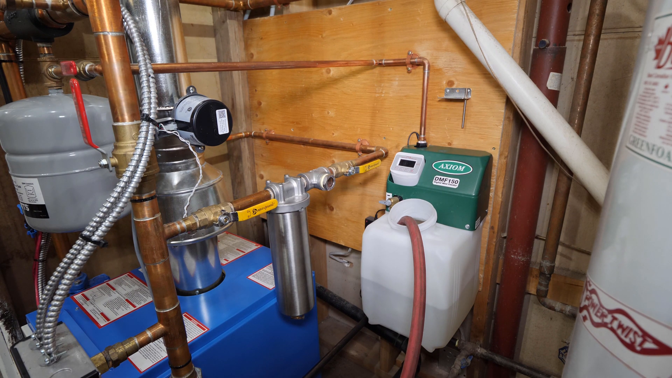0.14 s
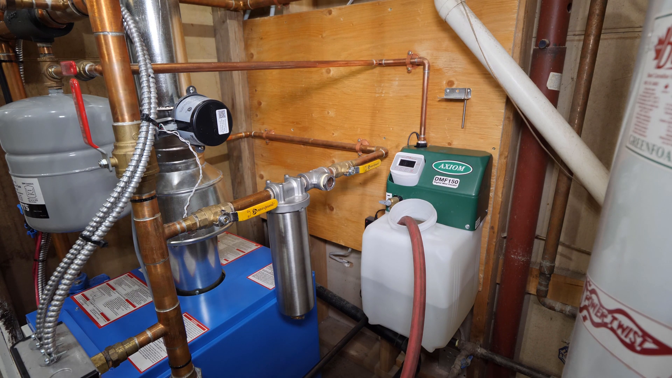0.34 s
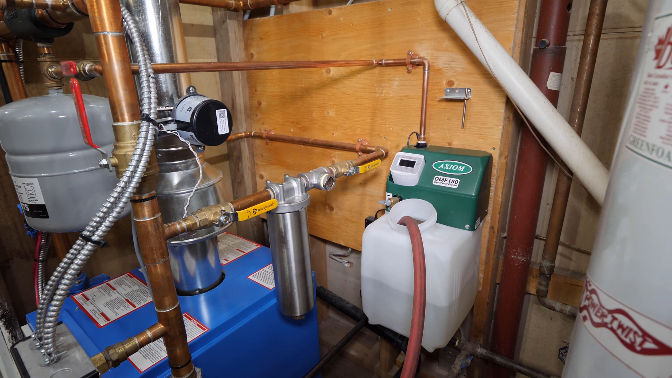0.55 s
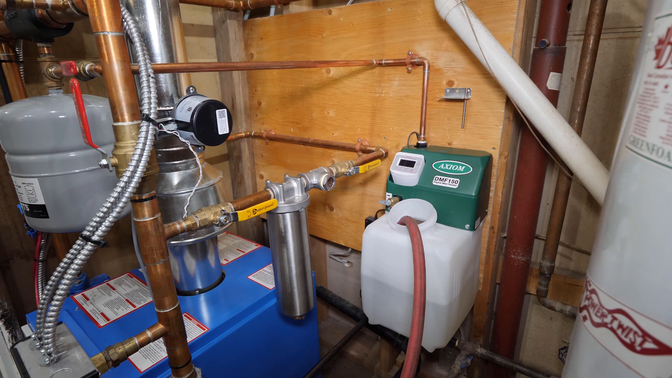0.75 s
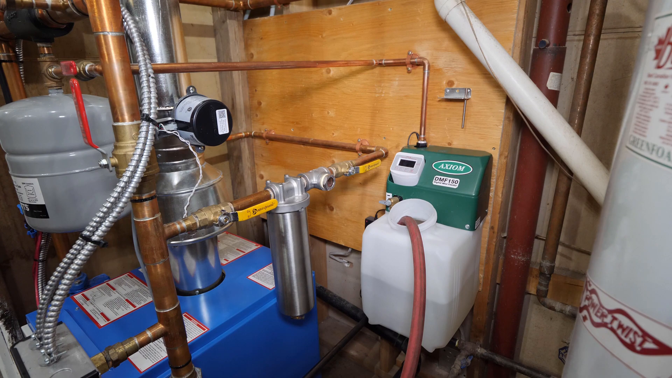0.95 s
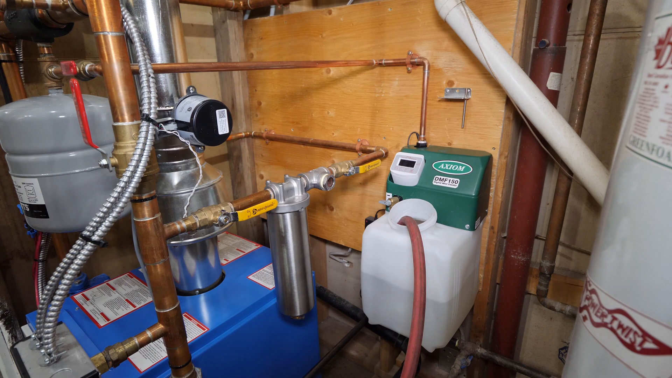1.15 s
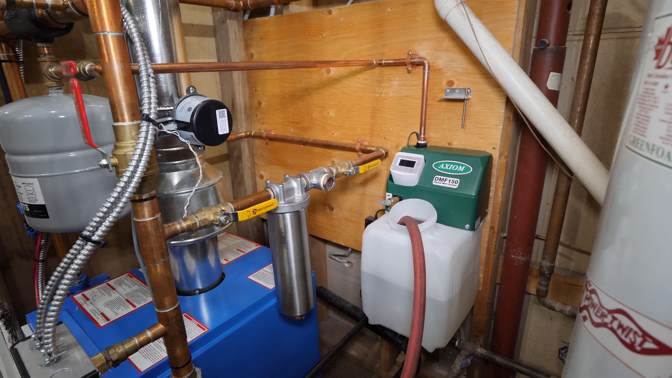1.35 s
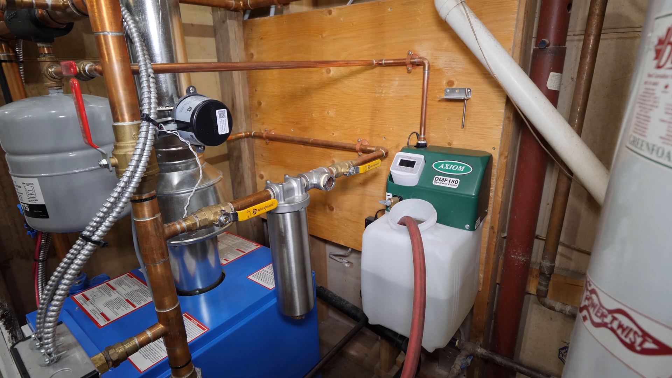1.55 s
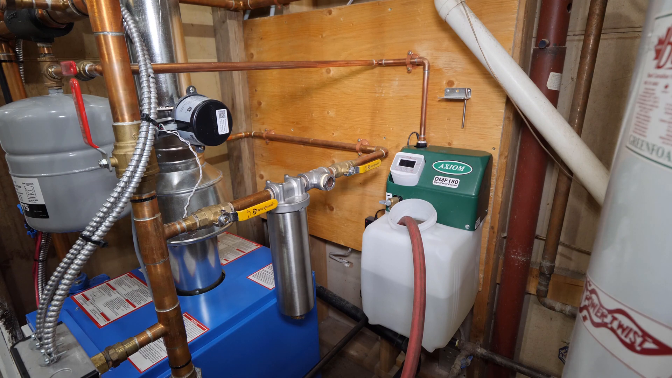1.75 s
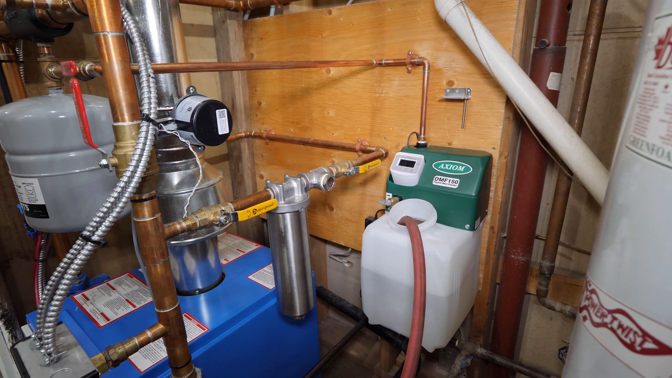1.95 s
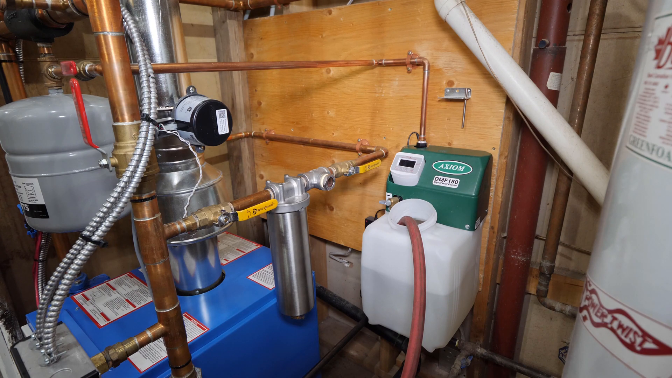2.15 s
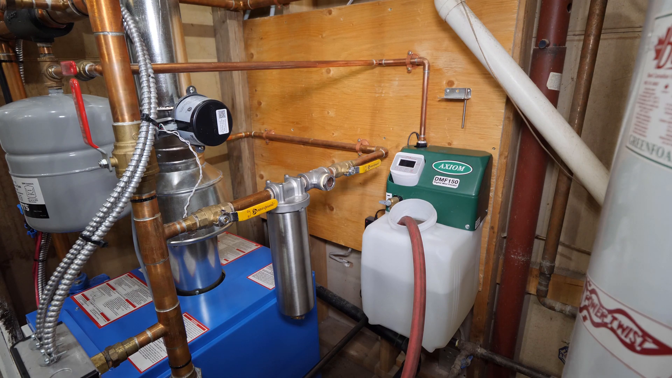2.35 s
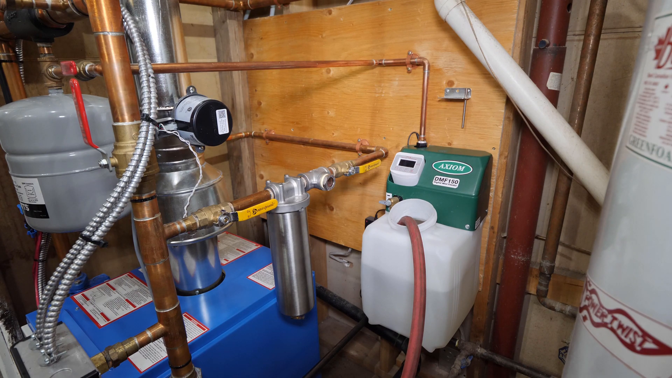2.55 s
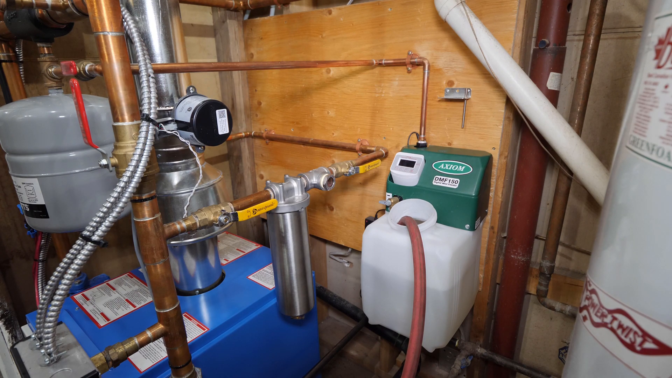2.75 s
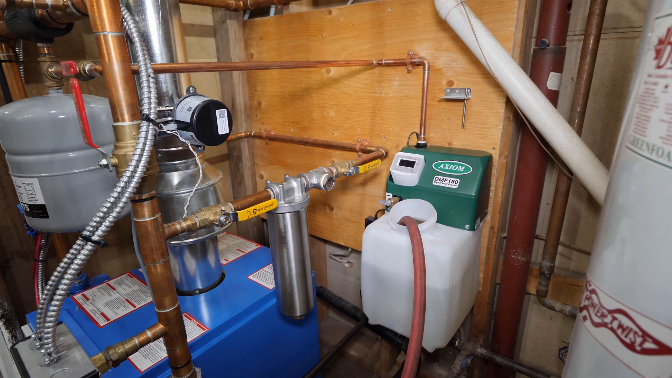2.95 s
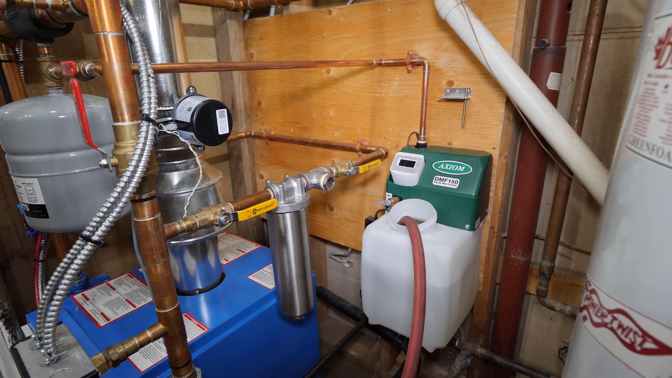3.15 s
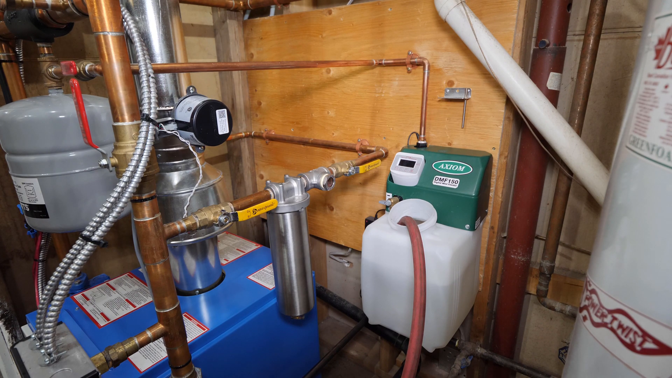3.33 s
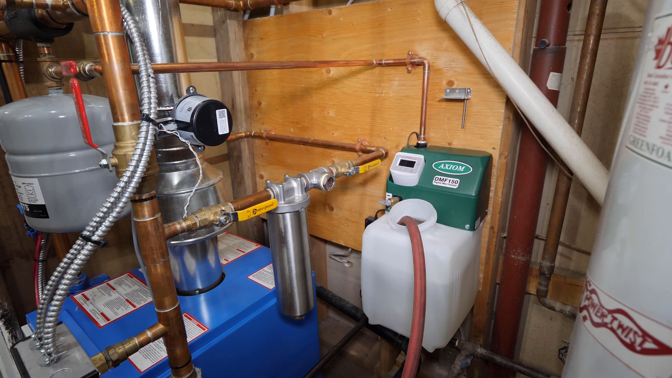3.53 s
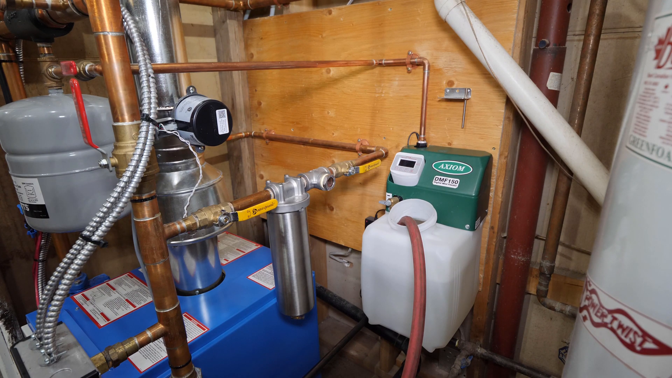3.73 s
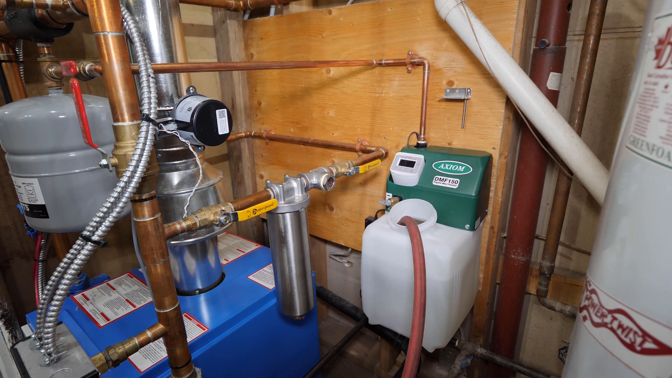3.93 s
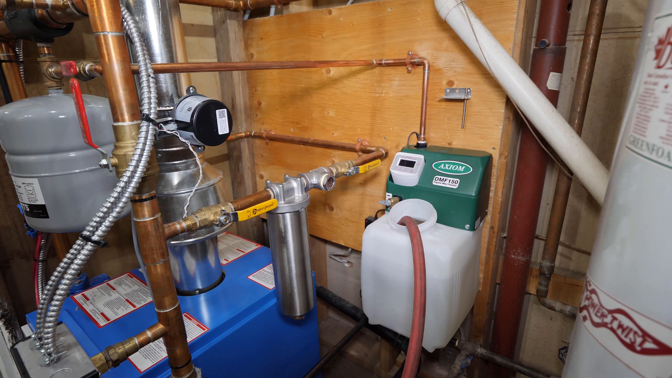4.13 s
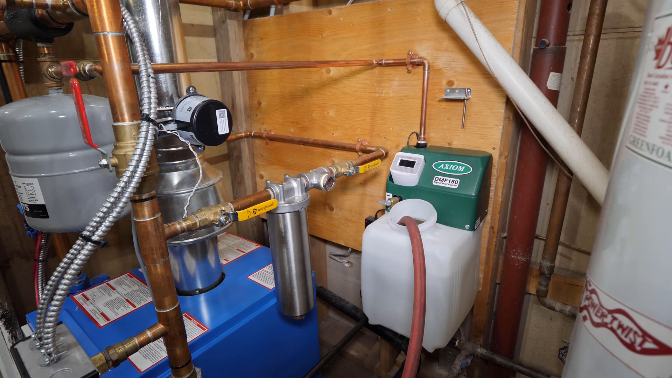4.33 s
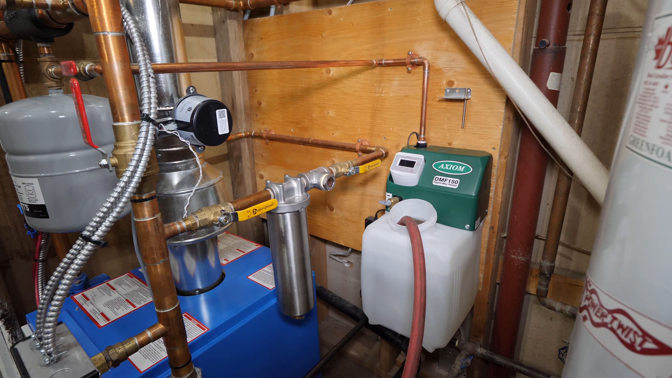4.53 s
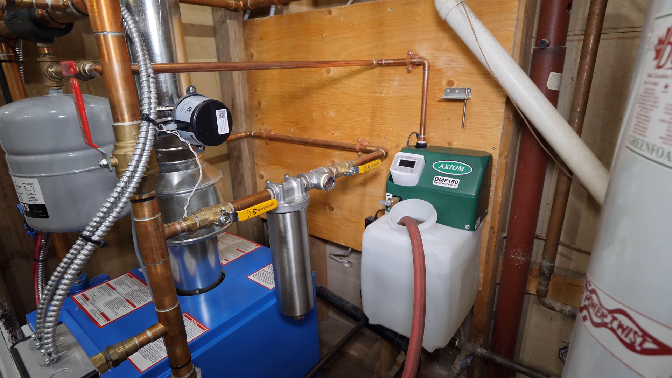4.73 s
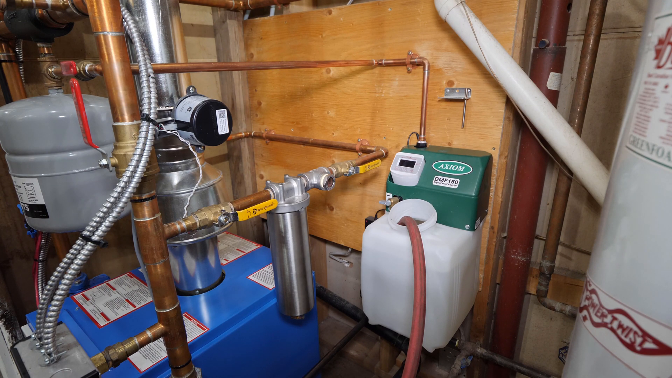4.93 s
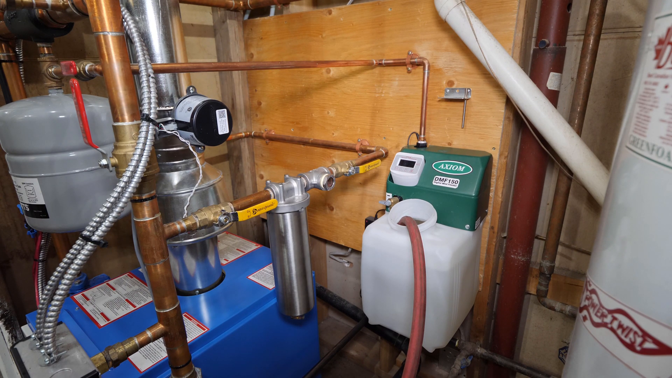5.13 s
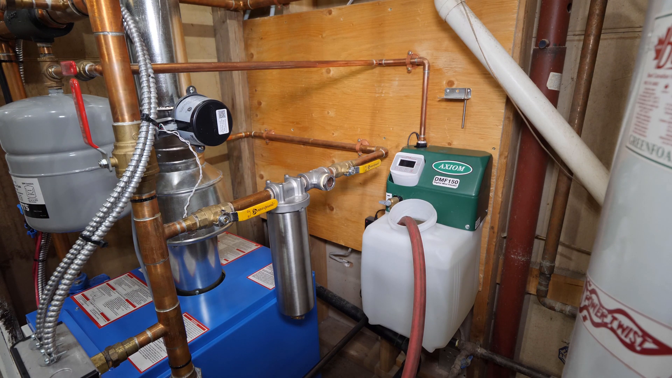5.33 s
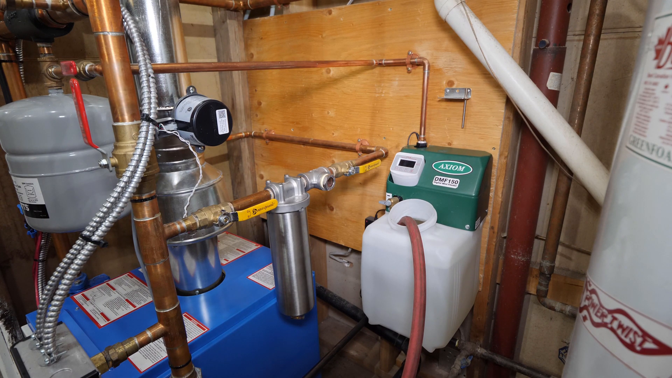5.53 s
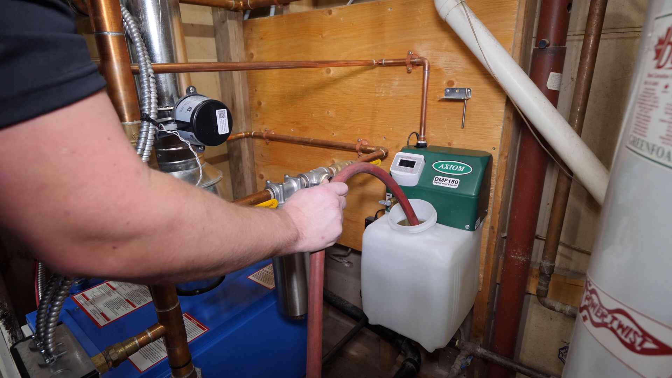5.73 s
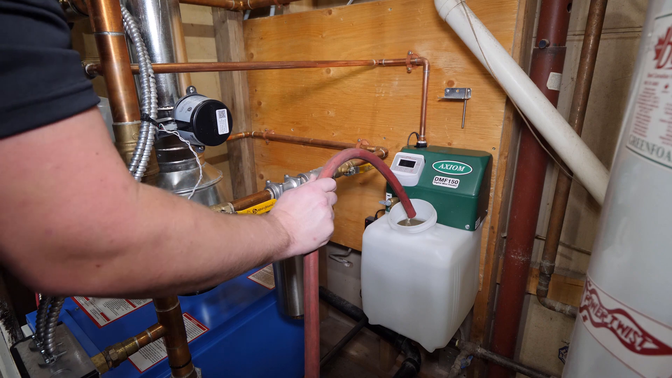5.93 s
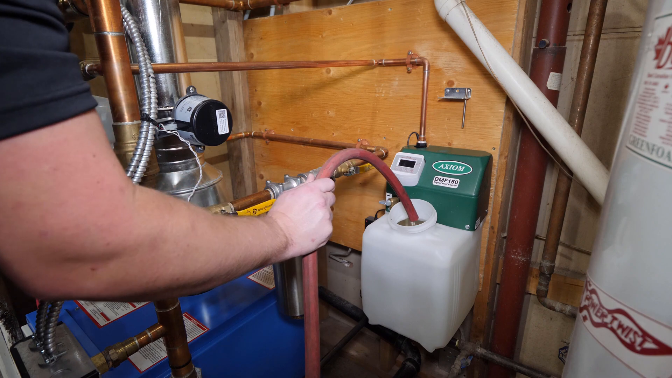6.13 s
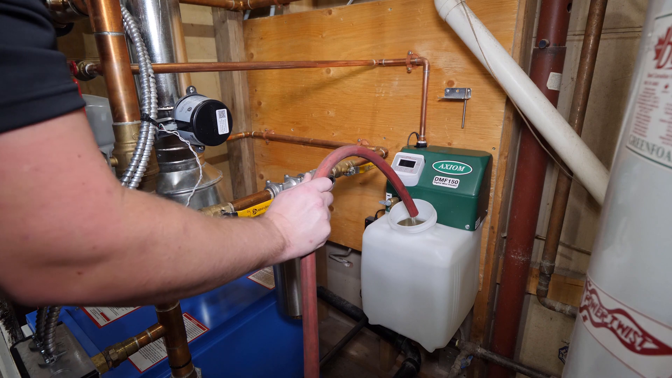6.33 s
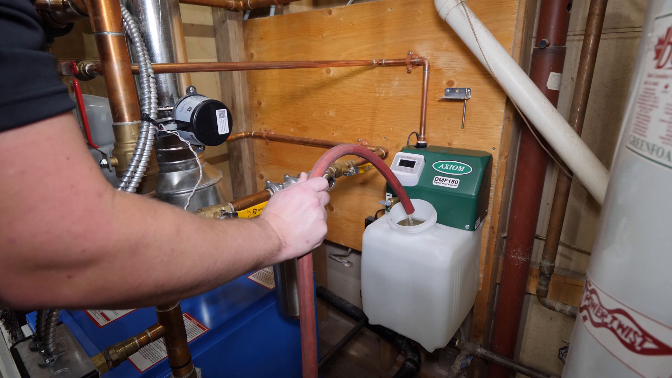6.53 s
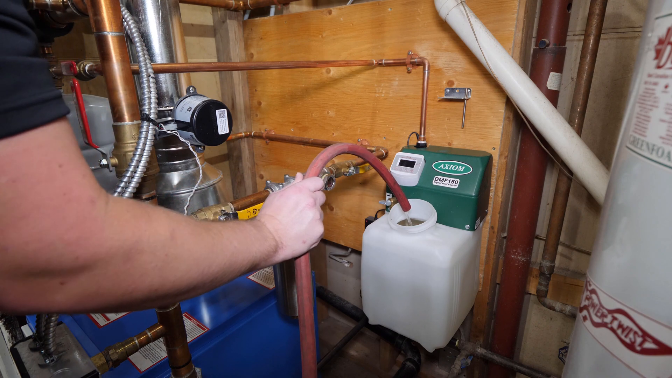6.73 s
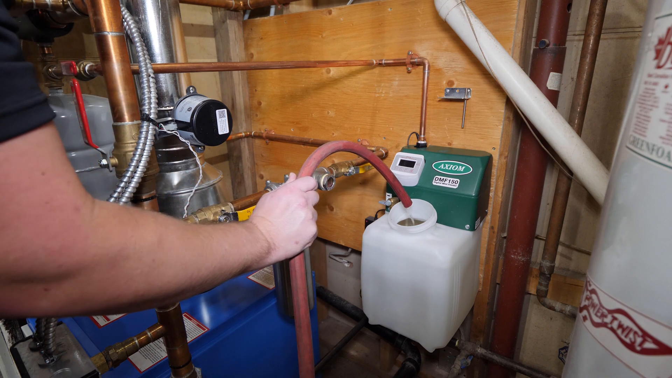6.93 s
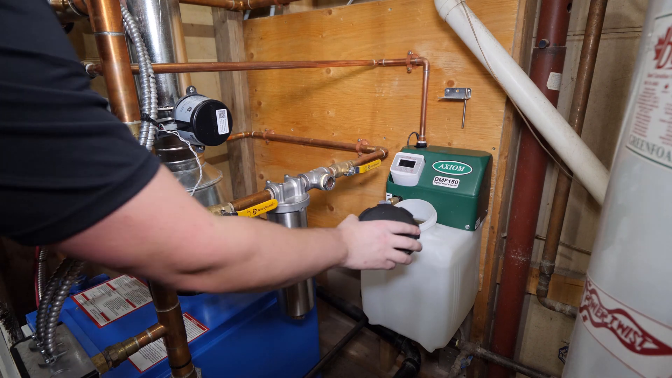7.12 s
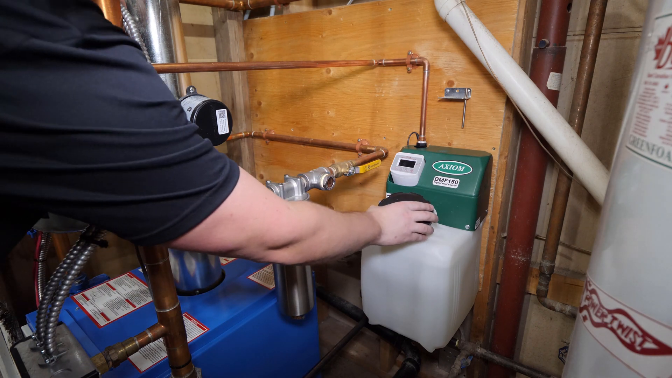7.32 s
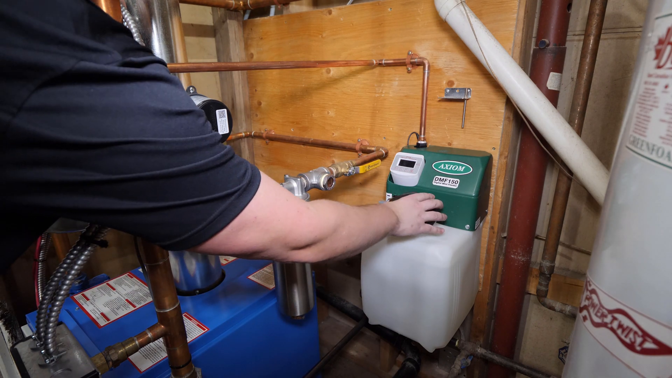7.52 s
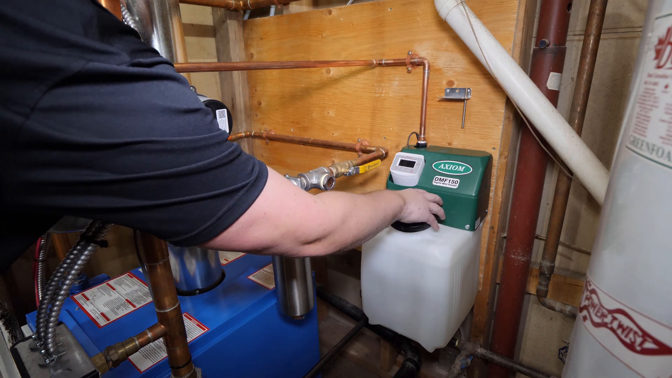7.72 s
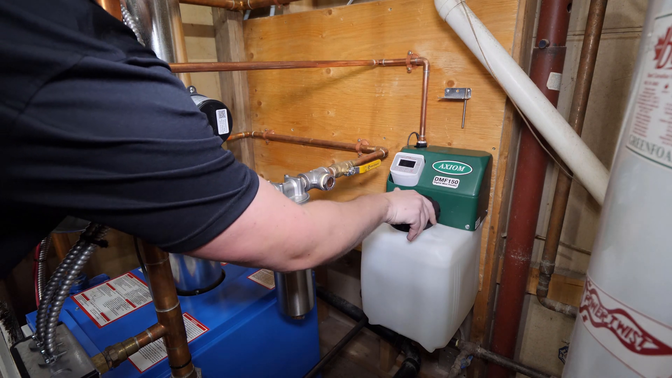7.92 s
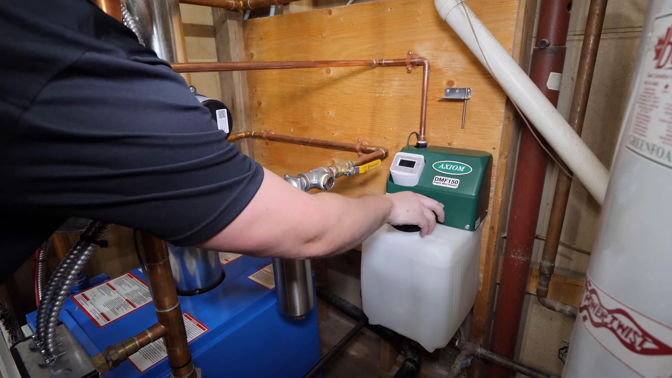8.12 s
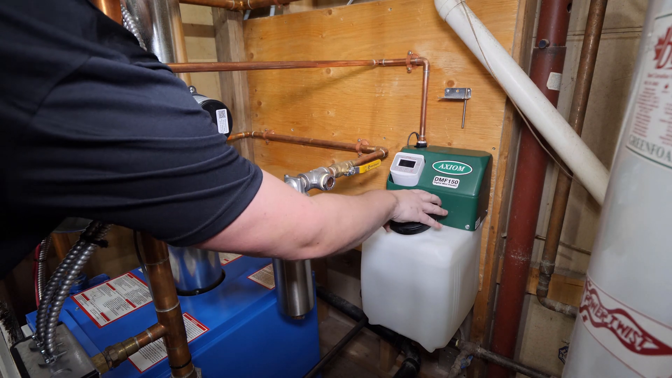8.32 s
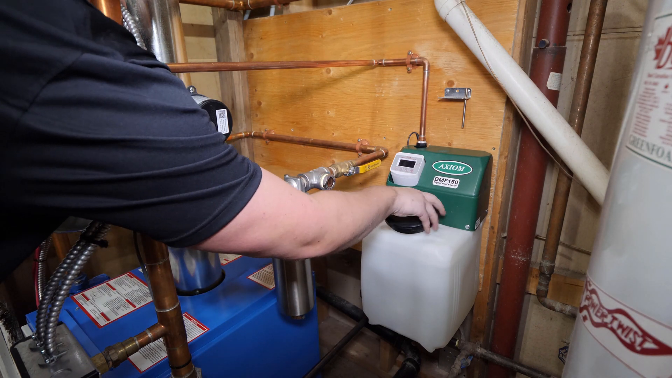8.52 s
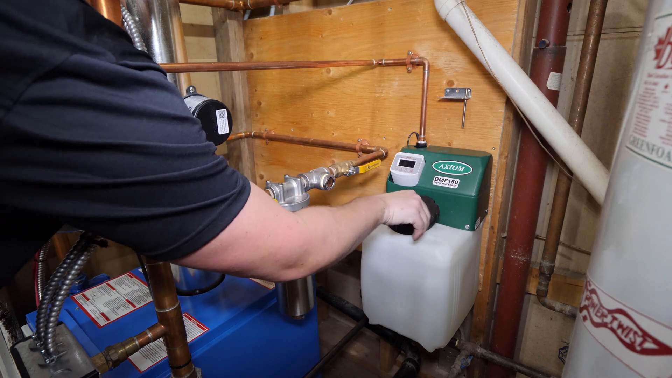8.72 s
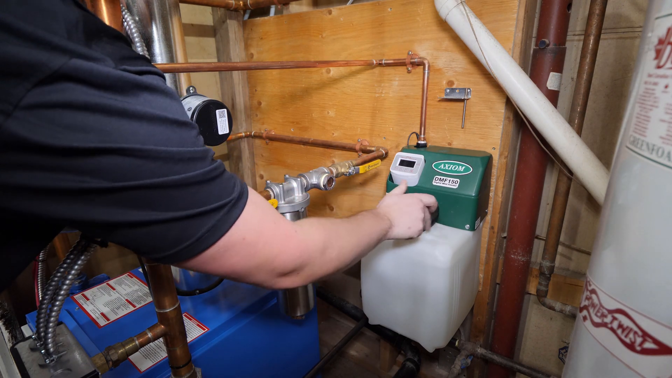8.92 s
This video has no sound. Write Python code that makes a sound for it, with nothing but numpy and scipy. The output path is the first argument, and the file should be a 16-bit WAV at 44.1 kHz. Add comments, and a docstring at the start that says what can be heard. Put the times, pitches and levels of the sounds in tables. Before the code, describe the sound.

A jet of water from a hose churns and fizzes steadily into a hollow plastic tank. The flow drops and stops with a dull thud and a brief pipe hum. The hose glugs and dribbles its last water into the tank. Then a plastic cap clacks onto the neck and is twisted down with sharp hollow knocks and short scrapes. The sounds are close, in a small, quiet boiler room.

```python
"""A jet from a hose fills a plastic tank in a small boiler room, churning up bubbles that ring the air
above the water. The flow is shut off with a thud, the pipe hums and the valve hisses faintly.
The lifted hose glugs and dribbles empty. Then a plastic cap is knocked onto the neck of the tank,
scraped round and pressed home, which makes cap and wall ring. Faint room noise lies under it all."""
import sys
import numpy as np
from scipy import signal
from scipy.fft import rfft, irfft, next_fast_len
from scipy.io import wavfile

SR = 44100
rng = np.random.default_rng(int(sys.argv[2]) if len(sys.argv) > 2 else 0)


def generate_wav(signal):
    """Clip the signal to [-1, 1] and save it as 16-bit WAV at the path in sys.argv[1]."""
    frames = np.transpose(np.atleast_2d(signal))
    scaled = np.clip(frames, -1, 1) * 32767
    pcm = np.round(scaled).astype(np.int16)
    wavfile.write(sys.argv[1], SR, pcm)


N = 395577
TIME = np.arange(N) / SR
BINS = np.fft.rfftfreq(8192, 1 / SR)  # the frequencies at which tone colours are drawn, f/Hz


def gain_of(db):
    """Turns decibels into a multiplier. Levels in the tables are relative: later gains shift them."""
    return 10 ** (np.asarray(db) / 20)


def unit_rms(x):
    """Scales a signal to an average strength (rms) of 1."""
    return x / np.sqrt(np.mean(x ** 2) + 1e-20)


def curve_at(points, hz=BINS):
    """Joins (frequency, value) points with straight lines on a pitch scale."""
    f, value = np.transpose(points)
    return np.interp(np.log(hz + 1), np.log(f + 1), value)


def add(mix, start_s, sound):
    """Mixes a sound in at the given time."""
    part = mix[max(round(start_s * SR), 0):][:len(sound)]
    part += sound[:len(part)]


def held(start, length, attack_s, release_s):
    """A loudness shape that rises, holds and dies away."""
    rise = np.clip((TIME - start) / attack_s, 0, 1)
    return rise * np.exp(-np.maximum(TIME - start - length, 0) / release_s)


def peaks(modes):
    """A tone colour in dB with a bump for each mode, a pitch at which something likes to ring."""
    return sum(db / (1 + (2 * (BINS - hz) / width) ** 2) ** 2 for hz, width, db in modes)


def colour(x, db):
    """Gives x a tone colour whose peaks ring after each click; only the shape of the curve counts."""
    log_gain = np.log(gain_of(np.r_[db, db[-2:0:-1]]))
    ring = np.fft.ifft(np.exp(np.conj(signal.hilbert(log_gain)))).real[:len(db)]
    return signal.oaconvolve(x, ring / np.linalg.norm(ring))[:len(x)]


def clicks(per_s, spread_db, size=N):
    """Clicks at random times and of uneven strength."""
    strength = gain_of(spread_db * np.minimum(rng.exponential(1, size), 4))
    return unit_rms(strength * rng.standard_normal(size) * (rng.random(size) < per_s / SR))


def wander(hz):
    """A smooth random wobble, up to about the given rate."""
    spectrum = rfft(rng.standard_normal(N))
    return unit_rms(irfft(spectrum / (1 + (np.fft.rfftfreq(N, 1 / SR) / hz) ** 4), N))


# Tone colour of the quiet room: f/Hz, level/dB
ROOM_NOISE = [(15, -100), (25, -39), (77, -19.5), (204, -17), (305, -10.5), (457, -4.5), (495, -15),
              (782, -15.5), (4380, -17.5), (4750, -16.5), (5580, -17), (12500, -21.5), (13500, -25.5),
              (15500, -35)]
def still_air(level_db=-66.5, width=0.39, mono_below_hz=550):
    """The faint steady noise of the room, alike in both ears in the bass."""
    tone = curve_at(ROOM_NOISE)
    bass_cut = np.maximum(-20 * np.log10(1 + (mono_below_hz / (BINS + 1)) ** 3), -60)
    mid = unit_rms(colour(rng.standard_normal(N), tone))
    side = width * unit_rms(colour(rng.standard_normal(N), tone + bass_cut))
    return gain_of(level_db) * unit_rms(np.array([mid + side, mid - side]))


# How long the room echoes: f/Hz, time to fade by 60 dB/s
ECHO_TIMES = [(120, 0.4), (400, 0.3), (1500, 0.18), (5000, 0.29), (15000, 0.18)]
def room(x, echo_db, width, left):
    """Adds two short echo tails: one alike in both ears (mid), one opposite (side) for width."""
    size = SR // 2
    echoes = rng.choice([-1., 1.], (2, size)) * (rng.random((2, size)) < 4000 / SR)
    hz, t, spectra = signal.stft(echoes * (TIME[:size] > .003), SR, nperseg=256)
    fade_s = curve_at(ECHO_TIMES, hz)[:, None]
    tails = signal.istft(spectra * gain_of(-60 * t / fade_s), SR, nperseg=256)[1]
    centre, around = signal.fftconvolve(x[None], tails / np.linalg.norm(tails[0]), axes=1)[:, :N]
    hz = np.fft.rfftfreq(next_fast_len(N + size), 1 / SR)
    padded = 2 * len(hz) - 2
    mid = rfft((x + gain_of(echo_db) * centre) / np.hypot(1, gain_of(echo_db)), padded)
    side = rfft(around, padded) * gain_of(curve_at(width, hz))
    lean = gain_of(curve_at(left, hz) / 2)
    return irfft(np.array([mid * lean + side, mid / lean - side]))[:, :N]


# Thin tones of water seeping through the shut valve, and of the wet hose: t/s, f/Hz, level/dB
VALVE_HISS = [(5.66, 4920, -66), (5.75, 4920, -64.5), (6.1, 4870, -68), (6.25, 4850, -59)]
VALVE_MOAN = [(5.7, 768, -68), (5.9, 780, -66), (6.05, 808, -67.5), (6.2, 778, -70)]
VALVE_SEEP = [(5.7, 2150, -71), (5.85, 2110, -73), (6.1, 2100, -81)]
HOSE_SQUEAL = [(7.085, 9400, -81), (7.11, 11200, -64), (7.135, 13200, -71), (7.21, 13100, -70),
               (7.26, 13600, -71), (7.36, 13400, -73)]
def whistle(rows, fuzz_hz, waver=0.0123):
    """Flow through a narrow gap makes a fuzzy tone whose pitch wavers."""
    times, hz, db = np.transpose(rows)
    pitch = np.interp(TIME, times, hz) * (1 + waver * wander(hz=25))
    phase = 2 * np.pi * np.cumsum(pitch) / SR
    sounding = (TIME >= times[0] - .02) & (TIME <= times[-1] + .02)
    tone = wander(fuzz_hz) * np.cos(phase) + wander(fuzz_hz) * np.sin(phase)
    return gain_of(np.interp(TIME, times, db)) * sounding * tone


SHUT_OFF_S = 5.616
def pipe_hum(hz=205, level_db=-48):
    """The jolted pipe hums on after the flow stops."""
    fade = held(SHUT_OFF_S, 0, attack_s=0.0028, release_s=0.17)
    return gain_of(level_db) * fade * np.sin(2 * np.pi * hz * TIME)


# Tone colour of the thud: f/Hz, level/dB
THUD_COLOUR = [(26, -71), (45, -40), (144, -2), (184, -7), (227, -10), (442, -5), (674, -8.5), (736, -10),
               (803, -9.5), (941, -21), (1460, -19), (1620, -28), (3000, -37), (3900, -57), (6600, -120)]
def shut_off_thud(level_db=-28, rise_s=0.0012, linger_db=-26):
    """The stopped flow jolts hose and pipe: a dull shudder that lingers faintly."""
    jolt = held(SHUT_OFF_S, 0, rise_s, release_s=0.034)
    linger = gain_of(linger_db) * held(SHUT_OFF_S, 0, rise_s, release_s=0.13)
    shudder = clicks(per_s=6900, spread_db=5) * (jolt + linger)
    return gain_of(level_db) * colour(shudder, curve_at(THUD_COLOUR))


def bubbles(low_hz, high_hz, per_s, cycles, rise, spread_db, sizes=28):
    """Bubbles of many sizes: each pings for some cycles and rises in pitch as it nears the surface."""
    out = np.zeros(N)
    for hz in np.geomspace(low_hz, high_hz, sizes):
        age = np.arange(int(5 * cycles * SR / hz)) * hz / (cycles * SR)  # counted in decay times
        ping = np.exp(-age) * np.sin(2 * np.pi * cycles * age * (1 + rise * age))
        births = clicks(per_s / sizes, spread_db)
        out += unit_rms(signal.oaconvolve(births, ping)[:N]) * np.sqrt(hz)
    return unit_rms(out)


# Pitches at which the air in the tank rings: f/Hz, width/Hz, boost/dB
TANK_MODES = [(727, 288, 17.5), (871, 133, 20.5), (933, 72, 12), (1088, 175, 22.5), (1321, 390, 22),
              (1517, 27, 11), (1653, 140, 14), (1774, 124, 14.5), (1960, 174, 13.5), (2370, 49, 10.5),
              (2469, 106, 14), (2579, 93, 12.5), (2695, 65, 9), (3003, 175, 15.5), (3255, 276, 12),
              (3434, 50, 12), (3552, 144, 10), (3820, 190, 7), (4037, 190, 9.5), (4287, 310, 12.5),
              (4656, 65, 11.5), (5980, 290, 4), (6657, 82, 9), (6990, 95, 9), (10060, 170, 8.5),
              (10800, 50, 14), (15280, 140, 18.5), (14960, 150, 9), (15700, 130, 14), (15600, 45, 0)]
def tank_air(strength, ripple_db):
    """Tone colour of the air in the tank; crowded high modes lift or hollow random pitches by ripple_db."""
    crowded = [(hz, 90, ripple_db * rng.choice([-1, 1])) for hz in rng.uniform(4400, 14000, 140)]
    return strength * peaks(TANK_MODES) + peaks(crowded)


# Slugs of water landing in the tank: t/s, splash level/dB, plop level/dB, fade time/s
LANDINGS = [(1.006, -35, -41, 0.013), (6.129, -38.5, -76, 0.011), (6.208, -48.5, -52, 0.019),
            (6.251, -41, -38, 0.029), (6.338, -44, -46, 0.025), (6.372, -48, -45, .018),
            (6.389, -37.5, -41.5, 0.014), (6.458, -46, -50.5, 0.071), (6.609, -42.5, -59, 0.01),
            (6.651, -65, -50, 0.023), (6.685, -59, -51, 0.044), (6.821, -41.5, -64, 0.013),
            (6.885, -47, -56, 0.021), (6.985, -49, -49.5, 0.0081)]
# Tone colours of the bright splash and the lower plop: f/Hz, level/dB
SPLASH_COLOUR = [(300, -58), (1500, -45), (3000, -10), (4200, -5.5), (6000, -1.5), (9000, -5),
                 (12000, -5.5), (15500, -24)]
PLOP_COLOUR = [(100, -52), (400, -4), (700, 1), (1400, -2), (2300, 2), (3500, -9), (6000, -41)]
def dribbles(splash_gain_db=-2, plop_gain_db=-8, uneven_db=6.0):
    """A thin uneven stream and slugs of water burst into droplets and bubbles that ring the tank."""
    stream = held(6.5, 0.5, attack_s=0.017, release_s=0.0072) * gain_of(uneven_db * wander(hz=19))
    splash_power = (gain_of(-58) * stream) ** 2  # overlapping splashes add in power
    plop_power = (gain_of(-60.5) * stream) ** 2
    for start, splash_db, plop_db, fade_s in LANDINGS:
        fade = np.exp(-TIME[:SR // 3] / fade_s)
        add(splash_power, start, (gain_of(splash_db) * fade) ** 2)
        add(plop_power, start, (gain_of(plop_db) * fade) ** 2)
    pings = bubbles(3000, 14000, per_s=1300, cycles=26, rise=.012, spread_db=1.5)
    drops = unit_rms(pings + .7 * clicks(per_s=4000, spread_db=2))
    pops = bubbles(800, 3500, per_s=2200, cycles=8, rise=.015, spread_db=1)
    tank = tank_air(strength=0.3, ripple_db=0)
    splash = colour(np.sqrt(splash_power) * drops, curve_at(SPLASH_COLOUR) + tank)
    plop = colour(np.sqrt(plop_power) * pops, curve_at(PLOP_COLOUR) + tank)
    return gain_of(splash_gain_db) * splash + gain_of(plop_gain_db) * plop


# Air gulped into the hose, and single large bubbles: t/s, f/Hz, level/dB
GULPS = [(6.205, 752, -24), (6.241, 736, -32.5), (6.335, 657, -40.5), (6.355, 990, -42), (6.39, 1470, -36),
         (6.457, 760, -29), (6.487, 713, -32), (6.511, 755, -31), (6.562, 710, -32.5), (6.653, 650, -38.5),
         (6.68, 1604, -38), (6.705, 605, -46.5), (6.884, 2470, -37), (6.938, 3970, -40), (6.945, 753, -46)]
def glugs(rise_s=0.0029, sag=0.022, typical_ring_s=0.018, typical_hz=750, typical_db=-31):
    """Air pockets ring in the mouth of the draining hose; stronger and higher ones die sooner."""
    out, t = np.zeros(N), TIME[:SR // 4]
    for start, hz, db in GULPS:
        ring_s = typical_ring_s * np.sqrt(typical_hz / hz)
        ring_s *= .5 ** ((db - typical_db) / 11.5)  # 11.5 dB louder rings half as long
        fade = np.exp(-t / ring_s)
        pitch = hz * (1 + sag * (2 * fade - 1))
        tone = np.sin(2 * np.pi * np.cumsum(pitch) / SR)
        add(out, start, gain_of(db) * (1 - np.exp(-t / rise_s)) * fade * tone)
    return out


# Pitches at which the tank wall and the cap ring: f/Hz, width/Hz, boost/dB
PLASTIC_MODES = [(164, 22, 8), (210, 18, 6), (260, 22, 6), (331, 24, 8), (361, 14, 9), (388, 22, 7),
                 (436, 30, 4), (566, 24, 4), (855, 25, 6), (1177, 24, 6), (1357, 50, 5), (1491, 30, 5),
                 (2770, 120, 4)]
# Tone colours of the tank wall and the hollow cap: f/Hz, level/dB
WALL_COLOUR = [(25, -37), (70, -33), (105, -23.5), (145, -3), (350, -0.5), (550, -3.5), (800, -9.5),
               (1400, -16.5), (4000, -97)]
CAP_COLOUR = [(60, -66), (200, -30), (500, -4), (780, 8.5), (1200, 10), (1600, 7.5), (2200, 7), (3000, -5),
              (4000, -8), (7000, -31), (15000, -51)]
def ringing_plastic(wall_force, cap_force, variety_db=0, cap_boost_db=0):
    """Forces ring the wall and the cap; variety_db changes at random how strongly each mode rings."""
    modes = peaks([(hz, width, db + (rng.normal(0, variety_db) if variety_db else 0))
                   for hz, width, db in PLASTIC_MODES])
    wall = colour(wall_force, curve_at(WALL_COLOUR) + modes)
    cap = colour(cap_force, curve_at(CAP_COLOUR) + modes + cap_boost_db)
    return wall, cap


# Strokes of cap and fingers: t/s, length/s, wall rumble level/dB, scrape level/dB, rasp level/dB
STROKES = [(7.116, 0.51, -72, -64.5, -66.5), (7.402, .12, -33.5, -39, -56),
           (7.595, 0.067, -26.5, -28.5, -49), (7.736, 0.094, -24.5, -30, -44),
           (7.886, 0.072, -26.5, -43, -43), (8.11, 0.06, -59, -68, -57), (8.276, 0.076, -32, -40.5, -49.5),
           (8.375, 0.066, -52, -49, -55), (8.485, .05, -51, -51, -61), (8.538, .06, -36, -35.5, -45.5),
           (8.615, 0.083, -24, -30.5, -46), (8.713, 0.058, -22.5, -29.5, -53),
           (8.802, 0.062, -28, -37.5, -78), (8.931, .05, -24.5, -41, -43.5)]
# Tone colour of the rasping fingers: f/Hz, level/dB
RASP_COLOUR = [(800, -13), (2500, 2.5), (4000, 5.5), (7000, 6), (10000, 2.5), (13000, -1.5), (15500, -23)]
def cap_rubbing(plastic_gain_db=-2, finger_gain_db=-1, ease_db_per_s=13):
    """The cap sticks and slips on the thread, shaking cap and wall; fingers rasp over the plastic."""
    power = np.zeros((3, N))
    for start, length, *levels_db in STROKES:
        grip = held(start, length, attack_s=.012, release_s=0.016)
        easing = gain_of(-ease_db_per_s * np.maximum(TIME - start, 0))
        power += np.outer(gain_of(levels_db), grip * easing) ** 2
    rumble, scrape, rasp = np.sqrt(power)
    slips = clicks(per_s=1700, spread_db=-1)
    wall, cap = ringing_plastic(rumble * slips, scrape * slips)
    fingers = colour(rasp * clicks(per_s=25000, spread_db=2.0), curve_at(RASP_COLOUR))
    return gain_of(plastic_gain_db) * (wall + cap) + gain_of(finger_gain_db) * fingers


# Knocks of the cap: t/s, cap clack level/dB, wall thump level/dB, rim tick level/dB,
# centre of the clack f/Hz, chatter/times the strength of the first blow
KNOCKS = [(7.326, -45, -50, -71, 1300, 1), (7.392, -9.5, -29.5, -41.5, 1280, 0.61),
          (7.539, -11, -30.5, -34, 1800, 0.67), (7.545, -12, -20.5, -42, 800, .49),
          (7.588, -5, -27.5, -31, 1320, 0.85), (7.719, -6, -34, -25, 2040, 1),
          (7.867, -16.5, -25, -31, 2210, 2.3), (7.874, -16.5, -18.5, -41, 620, 1.1),
          (8.117, -63, -57, -55, 2300, .81), (8.196, -54, -46.5, -74, 2150, 0.59),
          (8.257, -22, -34, -42, 1660, 3.3), (8.274, -11, -21.5, -34, 1610, 1.7),
          (8.33, -31, -29.5, -41, 1580, 0.72), (8.603, -13.5, -27, -35, 1530, 1.9),
          (8.614, -15, -21, -26, 1530, 1.8), (8.634, -9.5, -31, -47, 1400, 2.1),
          (8.724, -15, -36, -30, 1380, 2.6), (8.775, -15, -28, -34.5, 1500, 1.4),
          (8.789, -11.5, -25, -58, 1440, 0.84), (8.938, -24.5, -24.5, -50, 2060, 1.6),
          (8.950, -17.5, -31.5, -54, 1390, 1.4)]
# Tone colour of the cap's hard rim: f/Hz, level/dB
RIM_COLOUR = [(100, -67), (800, -58), (2200, 15), (3200, 11), (6500, 8.5), (9000, 0.5), (13000, -9),
              (15500, -26), (20000, -56.5)]
def cap_knocks(thump_gain_db=27.5, clack_gain_db=17, tick_gain_db=27, chatter_s=0.0028, rim_chatter=1.9):
    """A sharp blow and a brief chatter ring wall, cap and rim, a little differently each time."""
    out, t = np.zeros(N), TIME[:SR // 4]
    blow = signal.unit_impulse(len(t))
    for start, clack_db, thump_db, tick_db, clack_hz, chatter in KNOCKS:
        rattle = clicks(per_s=9900, spread_db=-6.5, size=len(t)) * np.exp(-t / chatter_s)
        rattle *= chatter / np.linalg.norm(rattle)
        force = (blow + rattle) / np.hypot(1, chatter)
        # the light rim recoils and chatters more
        buzz = (rim_chatter * rattle - blow) / np.hypot(1, rim_chatter * chatter)
        focus = peaks([(clack_hz, 1200, 8)])  # where the blow lands decides which pitches ring most
        wall, cap = ringing_plastic(force, force, variety_db=2.0, cap_boost_db=focus)
        thump = gain_of(thump_db + thump_gain_db) * wall
        clack = gain_of(clack_db + clack_gain_db) * cap
        tick = gain_of(tick_db + tick_gain_db) * colour(buzz, curve_at(RIM_COLOUR))
        add(out, start, thump + clack + tick)
    return out


# Tone colour of the jet: f/Hz, level/dB
JET_COLOUR = [(90, -33), (200, -54), (350, -12.5), (600, -17), (850, -16), (1300, -6), (2800, 0.5),
              (4300, -4.5), (5100, -17), (6700, -7.5), (8200, -16), (12900, -20), (13900, -7.5),
              (15800, -19)]
# Air that the jet drags under as the water deepens: t/s, level/dB
TRAPPED_AIR = [(0, -2), (.5, -5.5), (1.1, -5.5), (2.2, -1.5), (4.2, 0.9), (5.35, 1)]
# The flow swells briefly, then drops as the valve is turned down in two moves: t/s, level/dB
JET_FLOW = [(5.33, -0.5), (5.365, 0.5), (5.425, -8.5), (5.53, -9.5), (5.59, -20)]
def filling_jet(churn_db=-40, fizz_db=-35.5, spray_db=-43, surge_db=0.43, collapse_db_per_s=234):
    """The jet drives bubbles under and throws spray; all of it rings the air in the tank."""
    air_db = np.interp(TIME, *np.transpose(TRAPPED_AIR))
    flow_db = np.interp(TIME, *np.transpose(JET_FLOW))
    # once the valve is shut, the jet collapses with one last spurt
    collapse_db = -collapse_db_per_s * np.maximum(TIME - SHUT_OFF_S, 0)
    spurt = gain_of(-10) * held(SHUT_OFF_S, 0.032, attack_s=.015, release_s=0.032)
    churn = gain_of(churn_db) * gain_of(0.18 * air_db + flow_db + collapse_db)
    fizz = gain_of(fizz_db) * (gain_of(air_db + flow_db + collapse_db) + spurt)
    spray = gain_of(spray_db) * (gain_of(0.34 * flow_db + collapse_db) + spurt)
    froth = bubbles(300, 5000, per_s=14000, cycles=4, rise=.02, spread_db=1)
    froth += .8 * clicks(per_s=12000, spread_db=1)
    tone = curve_at(JET_COLOUR) + tank_air(strength=1.05, ripple_db=2.5)
    # big bubbles sound below 2000 Hz, spray above 4900 Hz, small bubbles in between
    above_low, above_high = (1 / (1 + (hz / (BINS + 1)) ** 12) + 1e-7 for hz in (2000, 4900))
    big = colour(froth, tone + 10 * np.log10(abs(1 - above_low) + 1e-6))
    small = colour(froth, tone + 10 * np.log10(above_low * abs(1 - above_high) + 1e-6))
    mist = colour(rng.standard_normal(N), tone + 10 * np.log10(above_high))
    surge = gain_of(surge_db * wander(hz=35))
    return surge * (churn * unit_rms(big) + fizz * unit_rms(small) + spray * mist)


# How wide each source sounds: f/Hz, side level minus mid level/dB
WATER_WIDTH = [(150, -30), (500, -41), (850, -20), (1200, -20), (1700, -23.5), (2400, -13), (3400, -9),
               (6500, -6.5), (15000, -9)]
HOSE_WIDTH = [(140, -38), (280, -24), (550, -21), (850, -13.5), (1600, -4.5), (3400, -8), (6500, -15.5),
              (15000, -6)]
CAP_WIDTH = [(140, -33), (500, -21.5), (1200, -8), (3400, -10), (6500, -13), (10000, -21), (15000, 1)]
# How far left each source sounds: f/Hz, left level minus right level/dB
WATER_LEFT = [(500, 1), (850, 2), (1400, 1.4), (2400, -0.4), (3300, 5), (4700, 0.3), (6700, 4),
              (10000, 0.5)]
HOSE_LEFT = [(250, -2), (550, 2.7), (1200, -1.7), (2400, -1), (3400, 1), (10000, 0)]
CAP_LEFT = [(250, 1.05), (550, 0.86), (1200, -1.4), (2400, -1), (4000, .1), (8000, -.6)]
def scene():
    """Water, valve, hose and cap echo in the room; the pipe hum and room noise are added on top."""
    valve = whistle(VALVE_HISS, fuzz_hz=170, waver=0.0046)
    valve += whistle(VALVE_MOAN, fuzz_hz=50) + whistle(VALVE_SEEP, fuzz_hz=270)
    squeal = whistle(HOSE_SQUEAL, fuzz_hz=280)
    water = room(filling_jet(), echo_db=-10.5, width=WATER_WIDTH, left=WATER_LEFT)
    hose = room(dribbles() + valve + squeal, echo_db=-1, width=HOSE_WIDTH, left=HOSE_LEFT)
    gulps = room(glugs(), echo_db=-2, width=HOSE_WIDTH, left=HOSE_LEFT)
    bumps = room(cap_knocks() + cap_rubbing() + shut_off_thud(), echo_db=1, width=CAP_WIDTH, left=CAP_LEFT)
    return water + hose + gulps + bumps + pipe_hum() + still_air()


def record(dry):
    """Cuts away the very highest treble, above 15950 Hz."""
    low_pass = signal.firwin(511, 15950, window=("kaiser", 9), fs=SR)
    return signal.oaconvolve(dry, low_pass[None], "same")


dry = scene()
out = record(dry)
generate_wav(out)
```